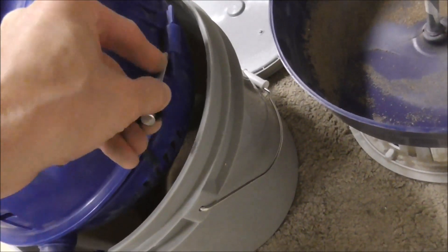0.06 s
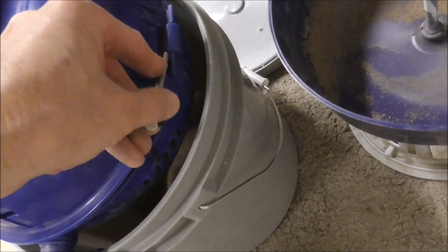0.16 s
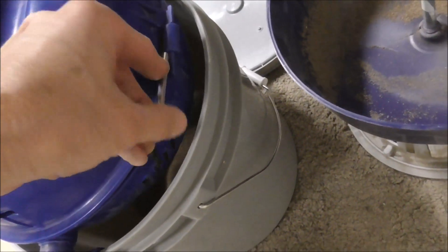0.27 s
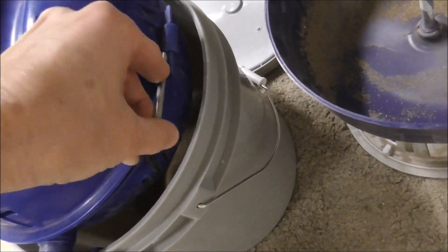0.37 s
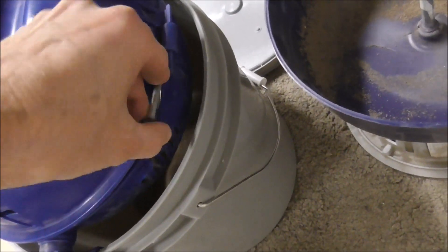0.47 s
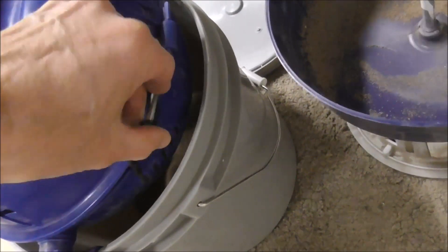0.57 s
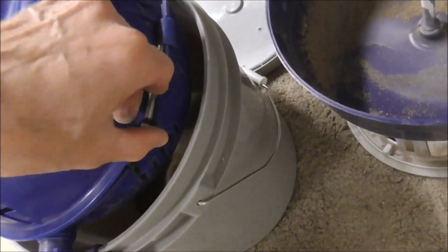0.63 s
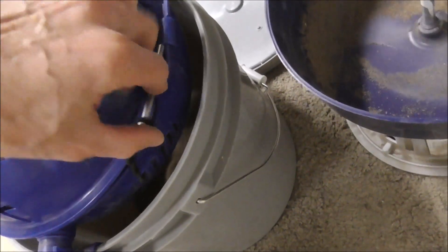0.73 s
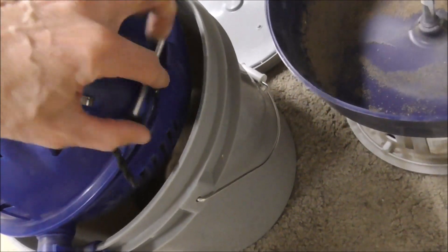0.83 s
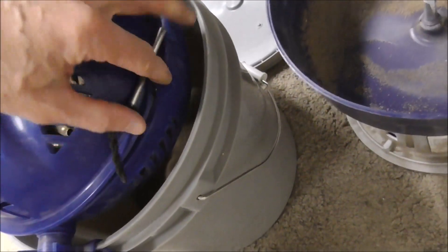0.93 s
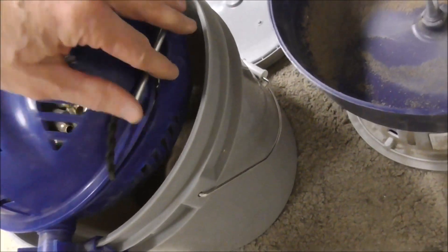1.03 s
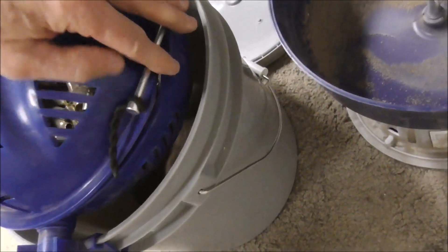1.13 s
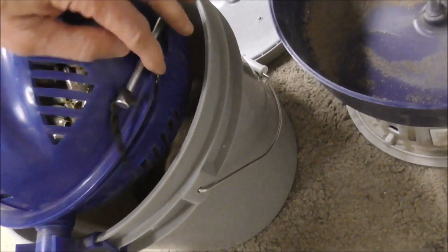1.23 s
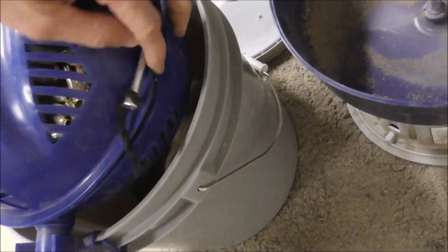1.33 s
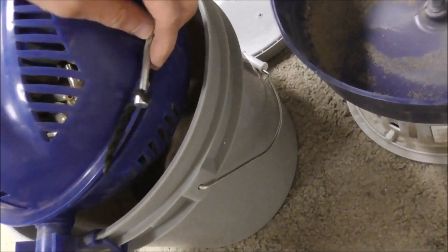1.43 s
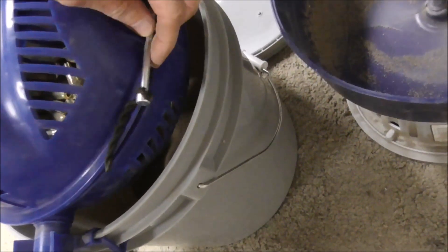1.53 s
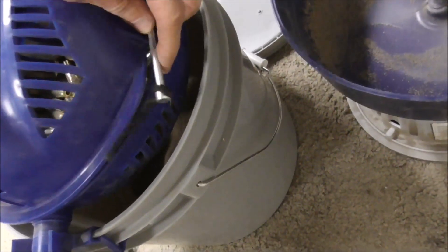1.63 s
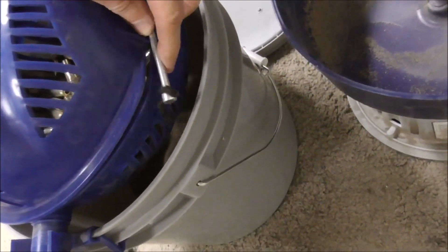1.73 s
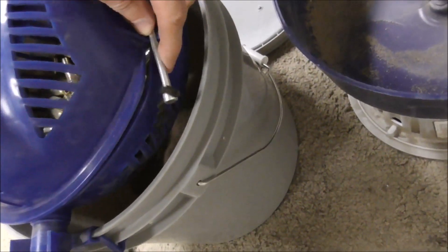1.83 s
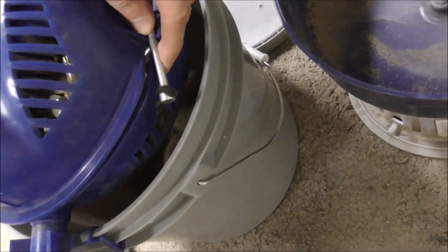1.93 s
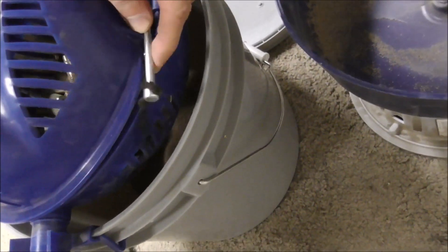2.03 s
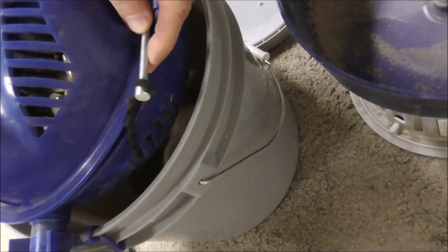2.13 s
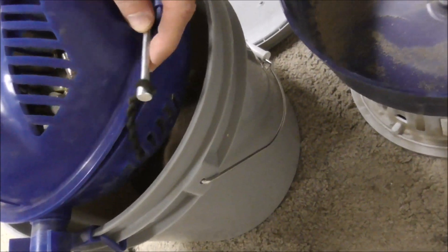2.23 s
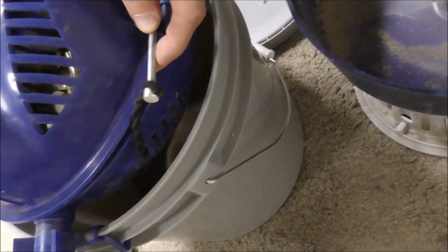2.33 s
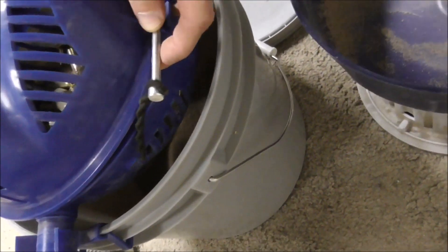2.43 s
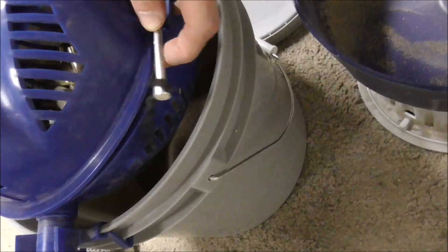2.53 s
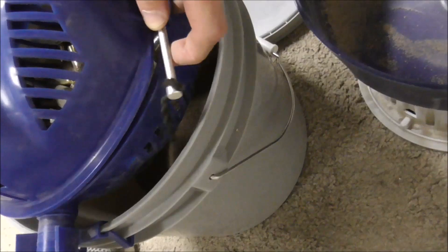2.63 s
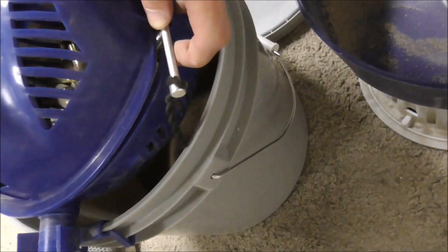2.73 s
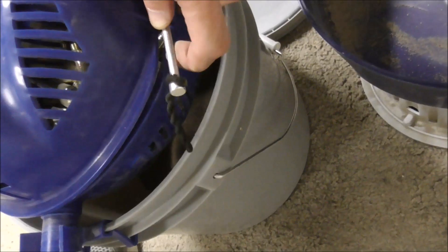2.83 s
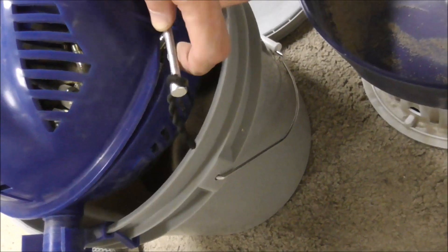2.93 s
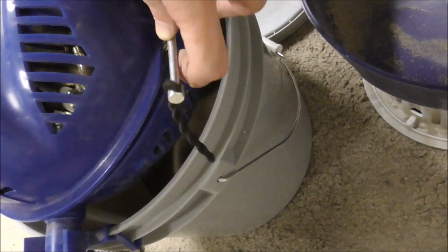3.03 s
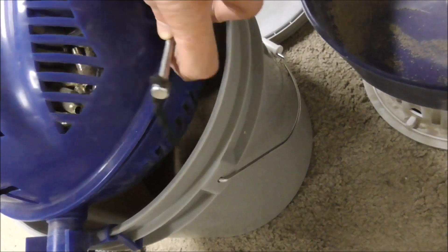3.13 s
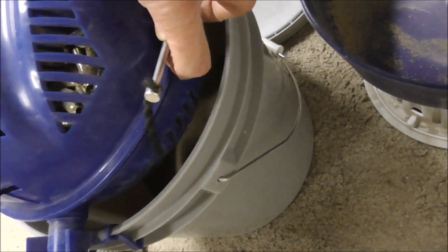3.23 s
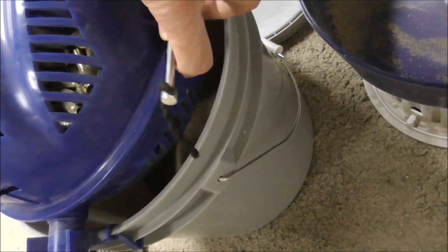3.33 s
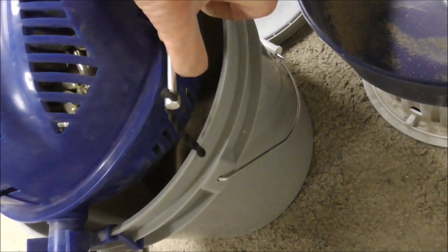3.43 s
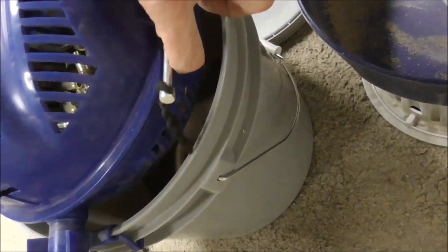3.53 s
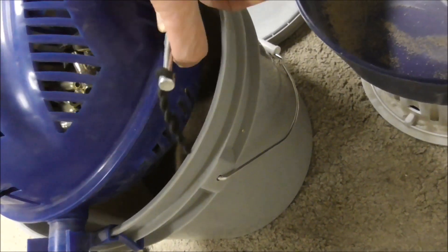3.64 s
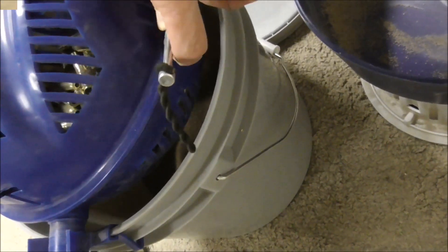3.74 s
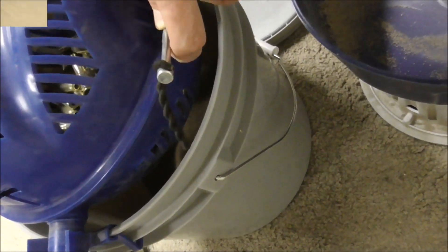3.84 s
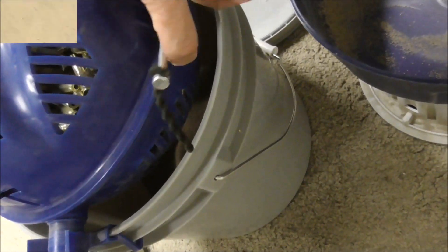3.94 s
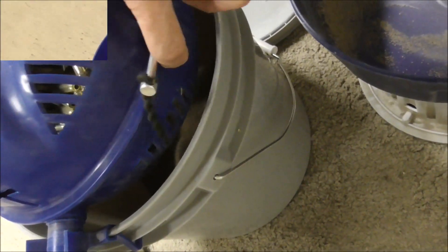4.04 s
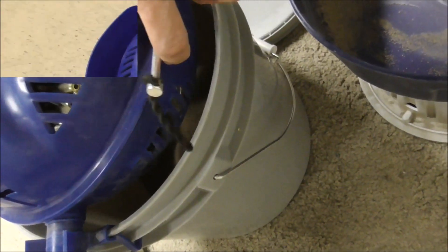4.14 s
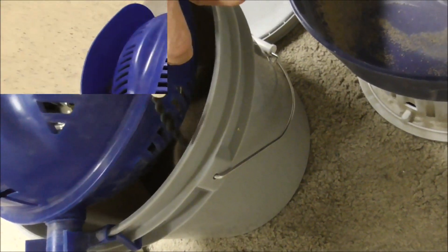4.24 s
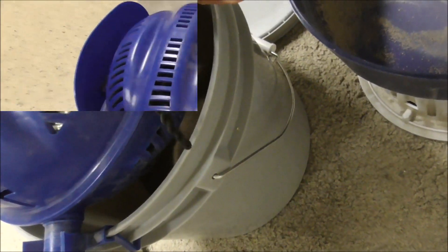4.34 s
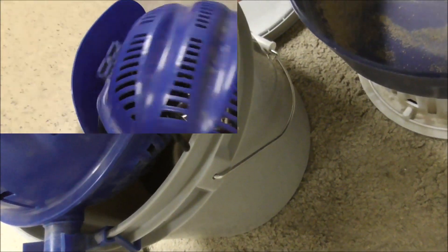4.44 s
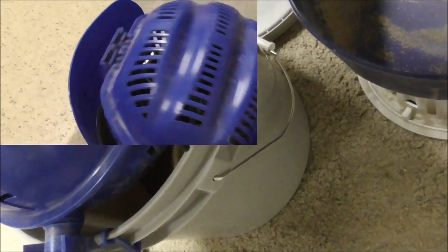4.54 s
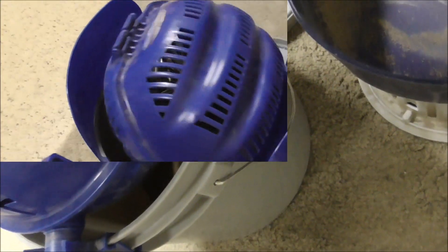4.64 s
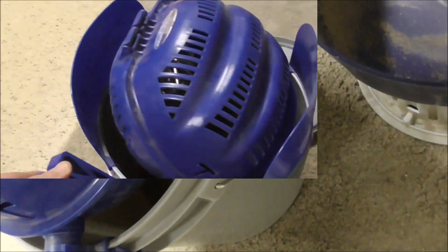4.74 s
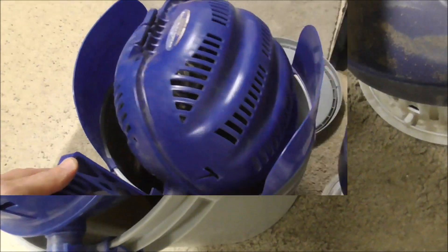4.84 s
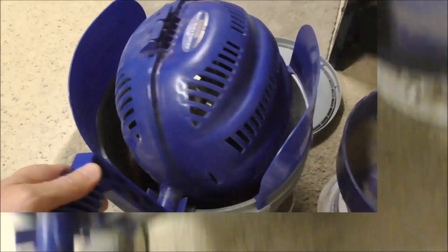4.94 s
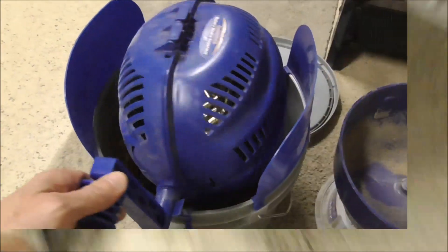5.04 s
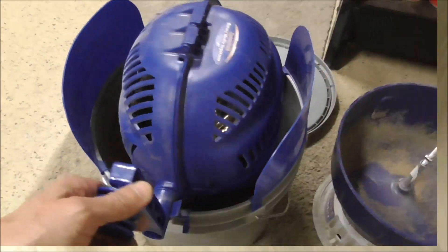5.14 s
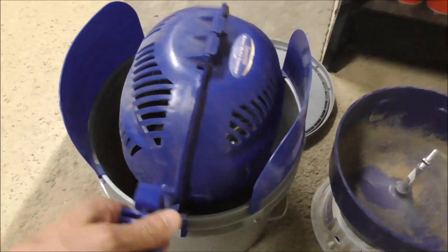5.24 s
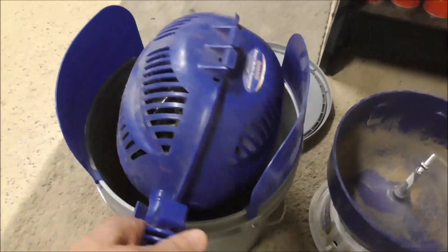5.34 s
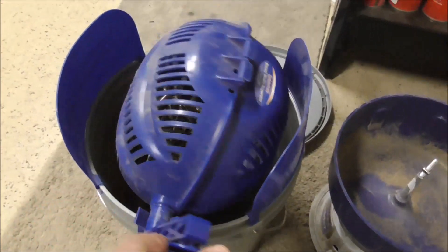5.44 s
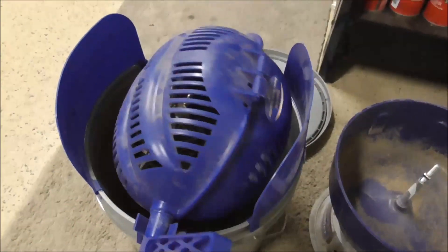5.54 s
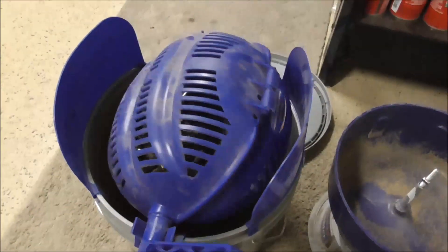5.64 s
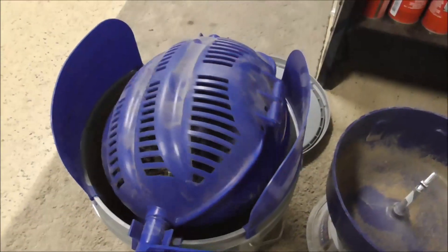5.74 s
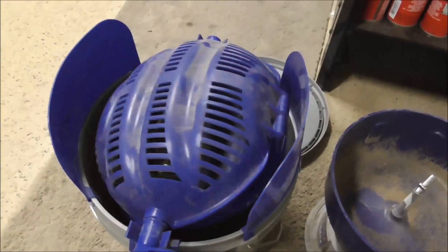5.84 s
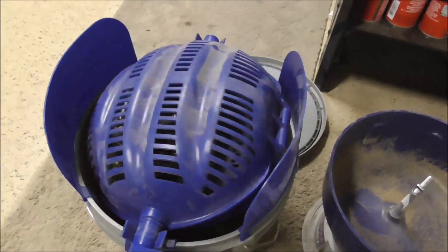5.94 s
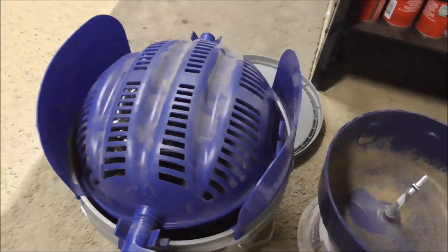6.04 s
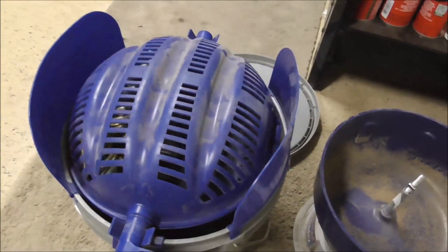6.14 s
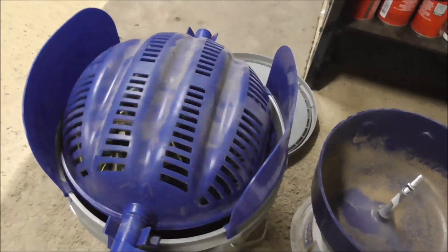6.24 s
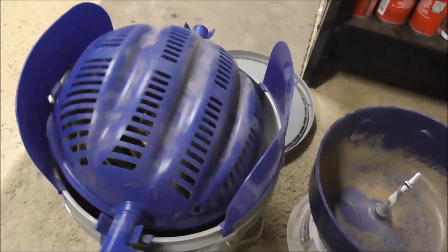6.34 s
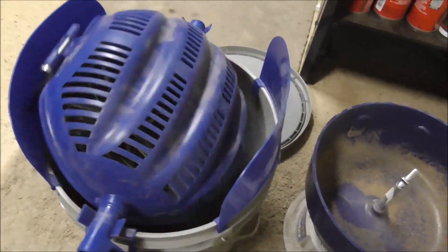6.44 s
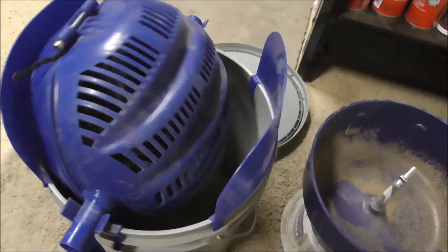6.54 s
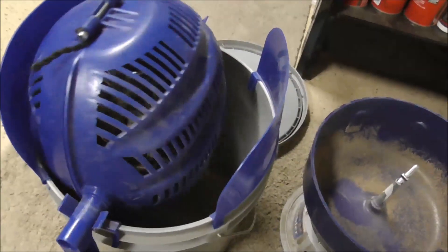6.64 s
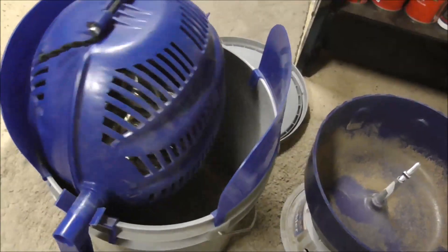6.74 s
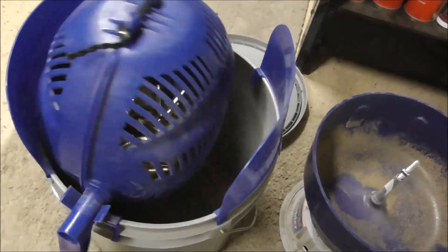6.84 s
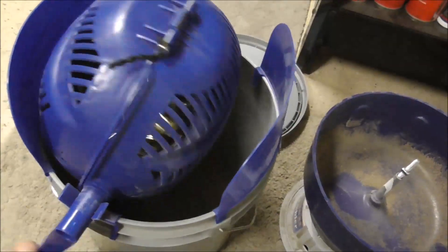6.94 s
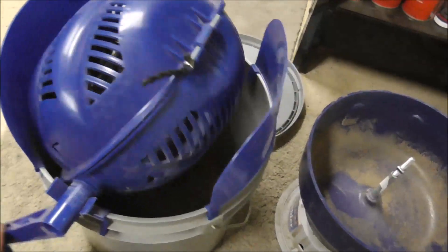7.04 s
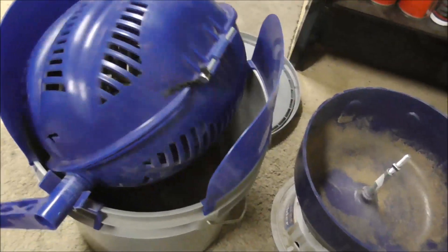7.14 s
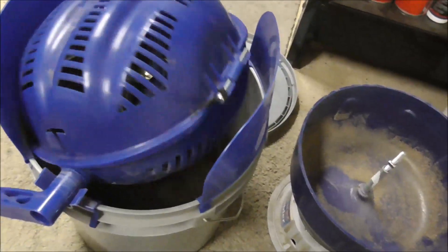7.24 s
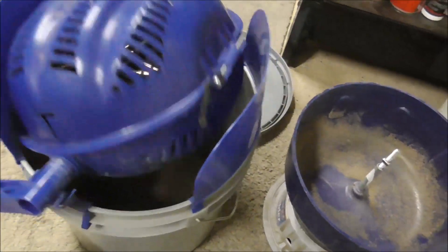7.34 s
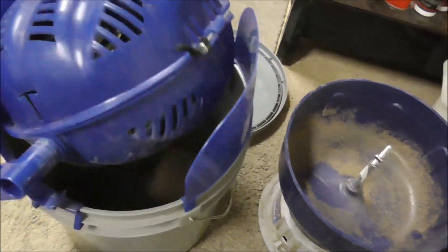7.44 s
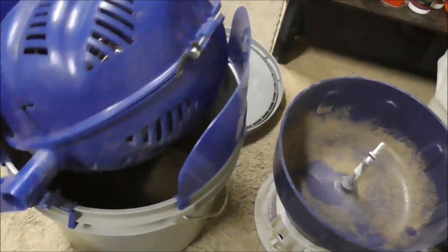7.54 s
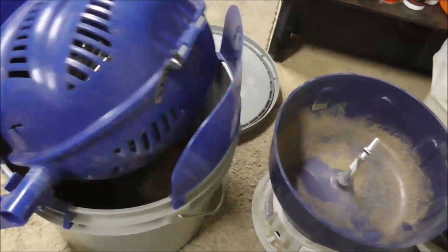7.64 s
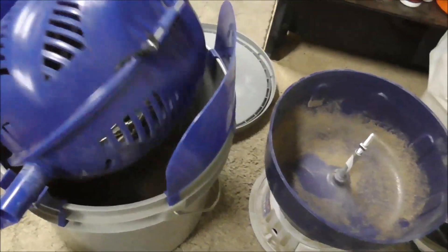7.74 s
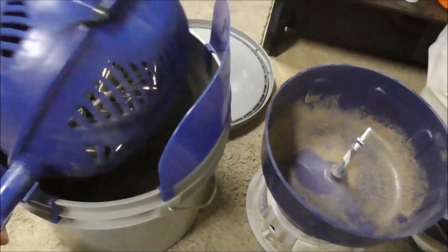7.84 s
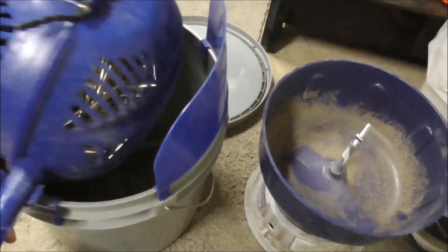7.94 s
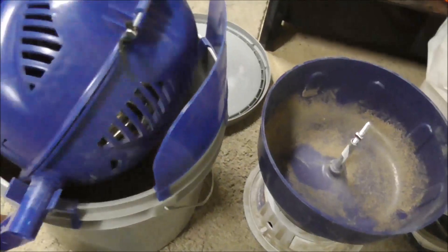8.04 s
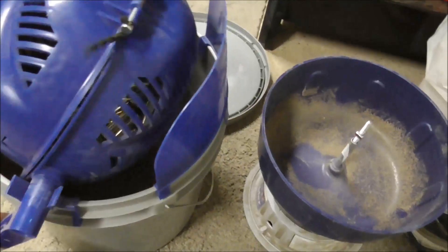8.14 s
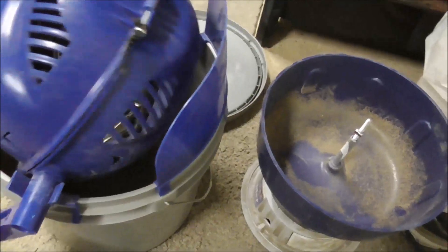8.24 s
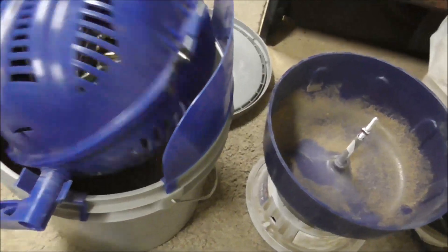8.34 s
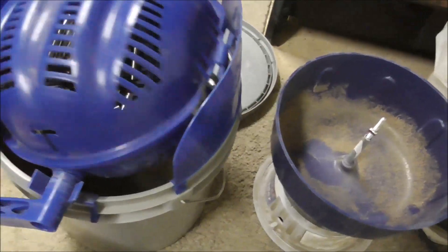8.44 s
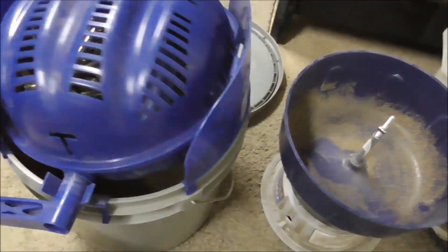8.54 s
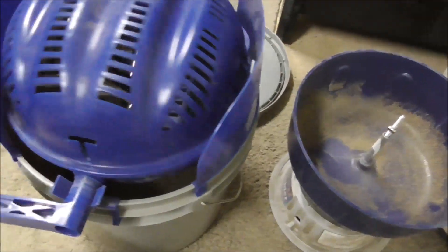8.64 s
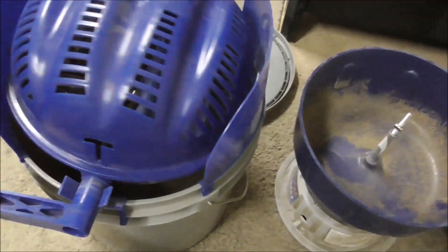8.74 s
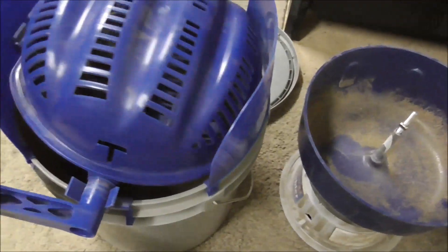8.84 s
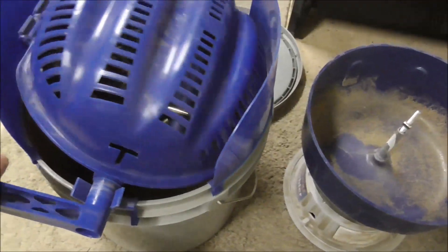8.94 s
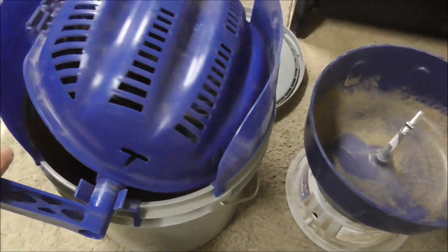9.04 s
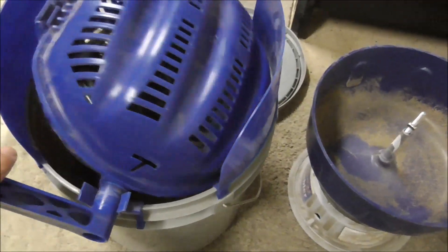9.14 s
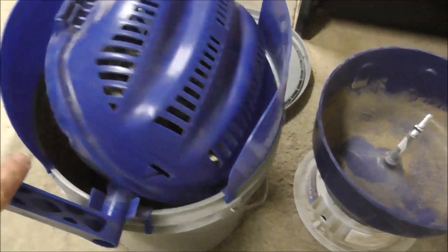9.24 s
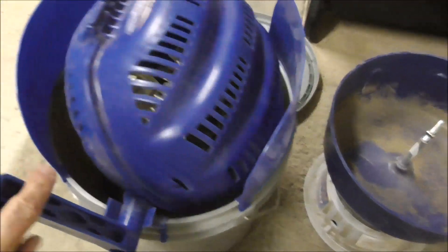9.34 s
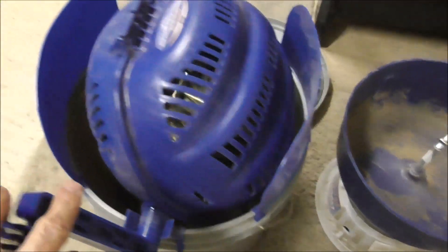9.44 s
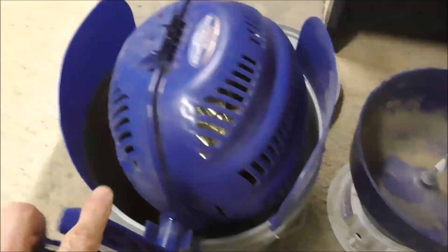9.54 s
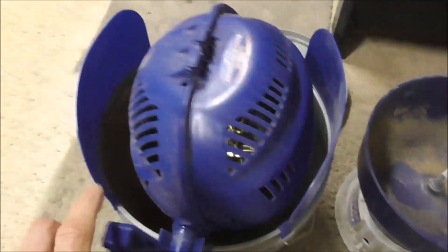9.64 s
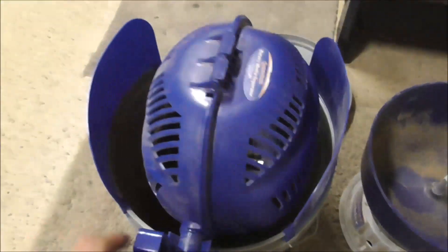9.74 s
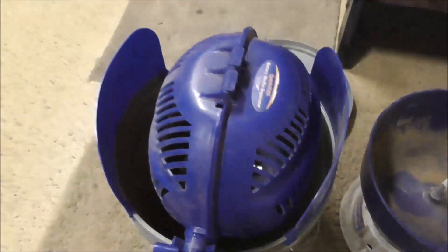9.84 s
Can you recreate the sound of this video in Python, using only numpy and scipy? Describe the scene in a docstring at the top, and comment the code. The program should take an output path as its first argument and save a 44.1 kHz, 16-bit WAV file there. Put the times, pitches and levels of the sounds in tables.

```python
"""A pin scrapes and knocks in the slots of a plastic sifting drum, close by in a small workroom.
The drum rests on a bucket; then it is cranked in spurts and the brass cases inside tumble and ring,
drumming on its wall; once the drum drops back on its seat with a thump.
Brass, wall and bucket are sums of decaying modes, contacts are noise bursts and clicks, rubbing is
coloured noise; diffuse stereo echoes make the room, over still air and a faint low drone."""
import sys
import numpy as np
from scipy import signal
from scipy.fft import rfft, irfft, next_fast_len
from scipy.io import wavfile

SR = 44100
rng = np.random.default_rng(int(sys.argv[2]) if len(sys.argv) > 2 else 0)


def store_pcm(level_fs):
    """Save levels as 16-bit WAV."""
    pcm = np.round(np.clip(level_fs, -1, 1) * 32767).astype(np.int16)
    wavfile.write(sys.argv[1], SR, np.atleast_2d(pcm).T)


N = 435708
TIME = np.arange(N) / SR
GRAIN_TIME = TIME[:SR // 4]

# the load slides as the drum turns:
# (start [s], swell [s], hold [s], settle [s], flow [dB], extra brass ring [dB])
SLIDES = [(4.74, 0.083, 0.036, .05, -13, -8), (4.82, .1, .16, 0.29, .5, -2),
          (5.162, 0.077, 0.043, 0.09, -4, -3.5), (5.338, 0.1, 0.27, .15, -18, -15),
          (5.678, 0.098, .17, .14, -5.5, -8), (6.06, .13, 0.58, .29, 0, -1.5),
          (6.879, 0.081, .14, 0.39, -14.5, 10), (7.198, .14, 0.078, 0.13, -3, -1.5),
          (7.441, .1, 0.1784, 0.34, -13, -1.5), (7.999, .1, 0.056, 0.056, -8, -18),
          (8.609, 0.11, 0.057, 0.045, -10, -11), (8.77, 0.062, .12, .2, -3, 2.5),
          (8.9, .2, 0.29, 0.47, -1.5, 3.5), (9.55, 0.093, 0.078, 0.078, -9.5, 8)]
# while the load slides, the hollow drum rocks and booms: (time of peak [s], half-length [s], level [dB])
ROCKING = [(5.59, 0.073, -42.5), (5.84, 0.16, -38.5)]
# single cases struck hard: (time [s], level before the common trim [dB])
CLINKS = [(4.7366, -30), (4.7885, -23), (4.856, -17.5), (5.1299, -15), (5.3754, -25.5), (5.4226, -26.5),
          (5.4818, -26), (5.5739, -32), (5.605, -29), (5.6504, -17), (5.719, -19), (5.836, -19),
          (5.7454, -12.5), (5.7863, -15.5), (5.87, -11.5), (5.967, -17.5), (6.0311, -14), (6.0774, -9.5),
          (6.1308, -10.5), (6.522, -25), (7.043, -27), (7.1229, -27), (7.2431, -20.5), (7.3292, -14.5),
          (7.6102, -18), (7.6641, -20), (7.6937, -17.5), (7.738, -20), (7.757, -13), (7.897, -27.5),
          (7.9595, -37), (8.1092, -23), (8.1554, -30), (8.3818, -23.5), (8.4248, -25), (8.6281, -39),
          (8.703, -24.5), (8.8016, -16), (9.857, -25.5)]
# blows on the plastic, first by the pin, then by the load and by the drum on its seat:
# (time [s], strength [dB], hardness of the contact [dB], weight behind it [dB])
KNOCKS = [(0.609, -44, -9, 1), (0.7731, -49, -1, -7), (0.9785, -26.5, 0, 3), (1.1681, -45.5, -8, -12),
          (1.4602, -23, -1.5, -0.5), (1.5298, -31, 2.5, -2.5), (1.709, -31.5, 4.5, 6.5), (1.814, -57, 5, 4),
          (2.6706, -57, 2, 7.5), (3.049, -18.5, -0.5, 2), (3.2884, -28, -3, -3), (4.0499, -32, -2, -15),
          (4.345, -36.5, -6, -10), (4.1588, -56, 14.5, -4), (4.7419, -38.5, 5.5, 5.5), (4.791, -47, 4, -1),
          (4.8574, -27, -2, 8), (4.8958, -21.5, -10, 6), (5.0184, -18, -8, 5), (5.4815, -33, 7, -2),
          (5.7519, -16.5, -2.5, 13), (5.836, -19.5, -3.5, -3), (5.911, -16.5, -3.5, -6),
          (5.9509, -17, -3, -8), (6.0299, -19.5, -1, 7.5), (6.1316, -24.5, 0, 6), (6.1549, -19.5, 4.5, 7),
          (6.1878, -16.5, -16, -14), (6.2915, -18, 2, 1), (6.7789, -20.5, -17, -12),
          (7.0453, -24.5, -6, -18), (7.3506, -23, 8.5, 12.5), (7.3902, -24, 5.5, -1),
          (7.431, -24.5, 5.5, -3.5), (7.7566, -25.5, 9.5, -1), (7.8469, -32, 2, 3), (7.8964, -34, 7.5, -3),
          (8.101, -18, -7, 26.5), (8.1067, -19, -14, 15), (8.1624, -31.5, -13, 12.5), (8.7008, -38, 2, 8),
          (8.7997, -27, 5, 9), (8.876, -16.5, 5, 6), (8.9409, -21.5, 12.5, 0), (9.0339, -16, -7, -10),
          (9.6062, -18, -14, -8), (9.72, -28.5, -14, -12), (9.852, -26.5, 4, -18)]
# strokes of fingers, pin and its cord on the plastic:
# (time of peak [s], rise [s], fall [s], level [dB], brightness [dB])
RUBS = [(0.02, 0.05, 0.09, -54.5, -7.5), (0.41, 0.038, 0.035, -60, -1), (0.78, 0.021, 0.026, -62.5, 12),
        (0.88, 0.044, .027, -66, 3), (1.40, 0.081, 0.13, -65, 9), (2.10, 0.035, 0.04, -62, 6),
        (2.21, 0.033, 0.021, -52, -8), (2.50, 0.037, .019, -53.5, 4.5), (3.51, .028, .032, -57.5, -22),
        (3.755, .001, 0.024, -41, 8), (3.825, 0.04, 0.022, -40, 6.5), (3.90, 0.11, .14, -52, 3.5),
        (4.054, 0.031, 0.056, -45, 3), (4.55, 0.5, 0.4, -55.5, 1.5), (8.519, 0.23, 0.087, -50, -7.5)]

# Modes; each voice scales the decay and scatters the pitch.
# ring of a brass case: (frequency [Hz], level [dB], undamped t60 [s], left over right [dB])
BRASS_MODES = [(9890, -2.5, .19, 2.2), (12850, 0, .18, -3.0), (14770, -3.3, .16, -1.5)]
# slats between the slots, wall of the drum, drum and bucket as a whole:
# (frequency [Hz], level [dB], t60 before damping [s])
SLAT_MODES = [(1876, 0.5, 0.019), (2406, 4, 0.021), (3312, 0, 0.024), (4075, -2, 0.023),
              (5020, -9.5, 0.036), (7090, -7.5, 0.057)]
WALL_MODES = [(433, -9.5, 0.019), (555, -10.5, 0.027), (602, 0, 0.04), (668.8, 1.5, 0.041),
              (790, -12.5, 0.018), (1007, -0.5, 0.012), (1249, -5, 0.023), (1440, -10.5, 0.0093)]
BUCKET_MODES = [(177, -10, 0.063), (235.1, 14, 0.13), (293.4, 10.5, 0.1), (362, -17, 0.02)]

# Relative colours of cases clacking, the crack of a blow, the rubbed drum body, its scratched surface,
# the hiss of the rubbing and the still air: (frequency [Hz], density [dB per Hz])
CLATTER_COLOUR = [(900, -27), (1700, 2), (2400, -4.5), (3800, 3.5), (5800, -6), (7100, 2), (9000, 1.5),
                  (15000, 3.5)]
CRACK_COLOUR = [(400, -34.5), (900, -3), (1400, 3.5), (2000, 4.5), (2700, -0.5), (3800, 2.5), (5200, -5.5),
                (7000, -3.5), (10000, -31), (15000, -38)]
RUB_COLOUR = [(100, -23), (240, 7.5), (450, 5), (670, 6.5), (900, 2.5), (1400, -5), (2200, -29),
              (4000, -47)]
SCRATCH_COLOUR = [(1200, -1), (1900, -0.5), (3000, -5.5), (5000, -5), (7000, -7), (9000, -31)]
HISS_COLOUR = [(5000, -23.5), (7500, 1.5), (11500, 0.5), (15000, -12)]
AIR_COLOUR = [(15, -25), (25, -31), (66, 0.5), (170, -6.5), (293, -1), (463, -10.5), (624, -5),
              (936, -12.5), (2550, -27.5), (3820, -25.5), (6380, -29), (7920, -23.5), (11000, -22),
              (14800, -25), (16000, -34)]

# decay of the room: (frequency [Hz], t60 [s])
ROOM_T60 = [(150, 0.5), (600, 0.5), (1300, 0.5), (4000, 0.58), (11000, 0.06)]
# strength of its echo: (frequency [Hz], level [dB])
ROOM_LEVEL = [(150, -13.5), (600, -14.5), (1200, -4), (2500, -16), (5000, -6), (8000, -12), (11000, -5)]

# what the flow sets sounding: (level at 0 dB flow [dB], growth [dB per dB of flow])
RING_LAW, CLATTER_LAW, SLAT_LAW = (-21.5, 1.66), (-28.5, 0.99), (-35, 0.93)  # rings need free tumbling
WALL_LAW, BOOM_LAW = (-25, 0.91), (-40.5, 0.63)
# the flow climbs this range in the swell and loses it in settling, along a rounded arc
SLIDE_RANGE_DB, SLIDE_BEND = 20, 1.5
CRANK_START_S = 4.6
BUSY_GROWTH = 0.6  # dB of collision rate for each dB of flow
HEAP_DAMPING_DB = (-2.5, 16)  # from a case lying on top to one buried in the heap
FREE_DAMPING = 1.3  # times the undamped decay rate

# how long contacts last: a blow on plastic, a case on a case, a clack in the heap
BLOW_T60_S, CLINK_T60_S, CLACK_T60_S = 0.018, 0.014, 0.016
# a blow of reference strength: its thump, crack and snap
BLOW_DB, THUMP_DB, CRACK_DB, SNAP_DB = -24.5, -39, -21, -41
# dB for each dB of strength: soft blows are dull, strong ones bright
THUMP_GROWTH, SNAP_GROWTH = 0.33, 2.1
SNAP_PER_HARDNESS = 0.99  # dB of snap for each dB of hardness
RIM_PITCH = 1.042  # the wall rings this much higher where it is struck near its stiff rim

SCRATCH_BELOW_DB, HISS_BELOW_DB = 10, 10
AIR_DB, DRONE_DB = -61, -76.5
DRONE_HZ = 70
CUTOFF_HZ = 15200


def tumble(busy_per_s, spread_db):
    """Random collisions, denser as the load slides faster; each rings a case, clacks and strikes plastic."""
    flow_db, extra_ring_db = flow()
    ring_db, clatter_db, slat_db, wall_db, boom_db = (
        db + growth * flow_db for db, growth in (RING_LAW, CLATTER_LAW, SLAT_LAW, WALL_LAW, BOOM_LAW))
    boom_db = 20 * np.log10(np.hypot(from_db(boom_db), from_db(rocking())))

    # busy_per_s is the rate at 0 dB flow
    per_s = busy_per_s * from_db(BUSY_GROWTH * np.clip(flow_db, -22, 5))
    per_s = per_s * (TIME > CRANK_START_S)
    hits = np.flatnonzero(rng.random(N) < per_s / SR)
    force = rng.standard_normal(len(hits))

    def heap_case():
        """A case rings, damped by its depth in the heap."""
        return brass(mistune=0.00346, spread_db=5.0, damping=from_db(rng.uniform(*HEAP_DAMPING_DB)))

    def clack():
        """Case meets case with a short coloured burst."""
        return unit(colour(crack(CLACK_T60_S, click=0.13, width=0.71), CLATTER_COLOUR))

    def slat():
        """The slats between the slots clack."""
        return plastic(SLAT_MODES, scatter=0.13, spread_db=6, damping=0.35, width=0.26)

    def wall():
        """The drum wall rings under the load."""
        return plastic(WALL_MODES, scatter=0.055, spread_db=6.5, damping=0.59, width=0.15)

    def boom():
        """Drum and bucket sound as one hollow body."""
        return plastic(BUCKET_MODES, scatter=0.06, spread_db=3.5, damping=0.38, width=0.19)

    voices = [(ring_db + extra_ring_db, heap_case), (clatter_db, clack),
              (slat_db, slat), (wall_db, wall), (boom_db, boom)]
    out = np.zeros((2, N))
    for level_db, voice in voices:
        sounds = [voice() for _ in range(120)]
        # part of each size is the shared force of the collision, part is the voice's own
        size_draw = 0.82 * force + 0.89 * rng.standard_normal(len(hits))
        sizes = from_db(spread_db * np.clip(size_draw, -3, 1.6))
        sizes = sizes / np.sqrt(np.mean(sizes ** 2))
        # a denser stream takes smaller grains for the same level
        gains = sizes * from_db(level_db[hits]) * np.sqrt(SR / per_s[hits])
        for at, gain, which in zip(hits, gains, rng.integers(0, len(sounds), len(hits))):
            add(out, at / SR, gain * sounds[which])
    return out


def flow():
    """How fast the load slides, in dB, and the extra brass ring: each slide swells, holds and settles."""
    power = 1e-12
    for start, swell, hold, settle, flow_db, ring_db in SLIDES:
        since = TIME - start
        before_hold = np.maximum(1 - since / swell, 0)
        after_hold = np.maximum((since - swell - hold) / settle, 0)
        away = before_hold + after_hold
        share = from_db(flow_db - SLIDE_RANGE_DB * away ** SLIDE_BEND) ** 2
        power = power + np.array([share, share * from_db(ring_db) ** 2])
    total_db, ringing_db = 10 * np.log10(power)
    return total_db, ringing_db - total_db


def rocking():
    """Level of the hollow boom of the rocking drum, in dB: a bell-shaped swell for each rock."""
    power = 1e-12
    for s, half, db in ROCKING:
        power = power + (from_db(db) * np.exp(-((TIME - s) / half) ** 2)) ** 2
    return 10 * np.log10(power)


def clinks(trim_db, tick_db):
    """A case falls on top of the heap and rings freely, with a bright tick at its start."""
    out = np.zeros((2, N))
    for s, db in CLINKS:
        ring = brass(mistune=0.00303, spread_db=1.0, damping=FREE_DAMPING)
        gain = from_db(db + trim_db) / np.abs(ring).max()
        tick = unit(band(crack(CLINK_T60_S, click=0.095, width=0.82), 2740, 0.45 * SR))
        add(out, s, gain * ring)
        add(out, s, gain * from_db(tick_db) * tick)
    return out


def brass(mistune, spread_db, damping):
    """One case: its oval wall splits each mode into a beating pair, and no two cases are quite alike."""
    out = np.zeros((2, len(GRAIN_TIME)))
    case_size = rng.normal()
    sides = np.array([[0.5], [-0.5]])
    for hz, db, t60, pan_db in BRASS_MODES * 2:
        own, strength, lead = rng.standard_normal(3)
        pitch = hz * (1 + mistune * (case_size + 0.52 * own))
        phase = 2 * np.pi * pitch * GRAIN_TIME + 0.97 * lead * sides
        decay = from_db(db + spread_db * strength - 60 * damping * GRAIN_TIME / t60)
        out += decay * from_db(pan_db * sides) * np.sin(phase)
    return unit(out)


def knocks(thump_s, wall_s, snap_s, sub_db):
    """Each blow cracks, rings the wall and shakes the bucket."""
    # each duration turns a level into the energy of a sound that holds it so long
    thump_hold, wall_hold, snap_hold = np.sqrt(np.array([thump_s, wall_s, snap_s]) * SR)
    struck_wall = np.array(WALL_MODES) * [RIM_PITCH, 1, 1]
    out = np.zeros((2, N))
    for s, strength_db, hardness_db, weight_db in KNOCKS:
        force_db = strength_db - BLOW_DB
        crack_db = CRACK_DB + force_db + hardness_db
        snap_db = SNAP_DB + SNAP_GROWTH * force_db + SNAP_PER_HARDNESS * hardness_db
        thump_db = THUMP_DB + THUMP_GROWTH * force_db + weight_db

        contact = crack(BLOW_T60_S, click=0.95, width=0.4)
        tick = colour(contact, CRACK_COLOUR)
        add(out, s, from_db(crack_db) * tick / np.abs(tick).max())
        add(out, s, from_db(snap_db) * snap_hold * unit(band(contact, 6360, 11200)))

        wall = plastic(struck_wall, scatter=0.034, spread_db=0.5, damping=0.91, width=0.14)
        add(out, s, from_db(strength_db) * wall_hold * wall)

        thump = from_db(thump_db) * thump_hold
        bucket = plastic(BUCKET_MODES, scatter=0.037, spread_db=2.5, damping=1.17, width=0.26)
        add(out, s, thump * bucket)
        floor = unit(band(crack(t60=0.057, click=0.3, width=0.21), 120, 314))  # the load on the floor
        add(out, s, thump * from_db(sub_db) * floor)
    return out


def plastic(modes, scatter, spread_db, damping, width):
    """One blow on plastic: the spot that is hit sets each mode's pitch, strength and sign."""
    hz, db, t60 = np.array(modes).T[:, :, None]
    pitch, strength, side = rng.standard_normal((3, len(modes), 1))
    t = GRAIN_TIME[:SR // 10]
    decay = from_db(db + spread_db * strength - 60 * damping * t / t60)
    rings = decay * np.sin(2 * np.pi * hz * (1 + scatter * pitch) * t)
    rings = rings * rng.choice([-1, 1], (len(modes), 1))
    sound = np.array([np.sum(rings * (1 + sign * width * side), 0) for sign in (1, -1)])
    # a slotted wall radiates little below its lowest mode
    pole = np.exp(-np.pi * modes[0][0] / SR)
    return unit(signal.lfilter([1, -2, 1], [1, -2 * pole, pole ** 2], sound))


def crack(t60, click, width):
    """The contact itself: a click and a short burst of noise for its dense high modes."""
    t = GRAIN_TIME[:SR // 25]
    burst = unit(white(len(t), width) * from_db(-60 * t / t60))
    burst[:, 0] += click
    return burst


def handling():
    """Each stroke swells and fades; it stirs the hollow drum and scratches its surface."""
    power = np.zeros((3, N))
    for s, rise, fall, db, bright_db in RUBS:
        levels_db = [db, db + bright_db - SCRATCH_BELOW_DB, db + bright_db - HISS_BELOW_DB]
        near = np.flatnonzero(np.abs(TIME - s) < 1)
        since = TIME[near] - s
        stroke = np.exp(-(since / np.where(since < 0, rise, fall)) ** 2)
        power[:, near] += (from_db(levels_db)[:, None] * stroke) ** 2
    body, scratch, hiss = np.sqrt(power)
    out = body * friction(RUB_COLOUR)
    out = out + scratch * friction(SCRATCH_COLOUR)
    return out + hiss * friction(HISS_COLOUR)


def friction(spectrum):
    """Tiny slips of uneven size through a colour; rms 1."""
    slips = np.repeat(from_db(4 * rng.standard_normal(N // 32 + 1)), 32)[:N]
    return unit(colour(white(N, width=0.39) * slips, spectrum)) * np.sqrt(N)


def room(x, first_echo_s, count=3):
    """Diffuse echoes die octave by octave; contacts at different spots beam treble along different paths."""
    t = TIME[:SR // 2]
    bass, treble = (signal.sosfilt(signal.butter(4, 1500, kind, fs=SR, output="sos"), x)
                    for kind in ("low", "high"))
    # the treble wanders among the paths at constant power, with about 120 new draws a second
    moments = TIME[::SR // 120]
    draws = rng.standard_normal((count, len(moments)))
    shares = np.array([np.interp(TIME, moments, draw) for draw in draws])
    shares = shares / np.sqrt(np.sum(shares ** 2, 0))
    onset = np.clip(t / first_echo_s - 1, 0, 1)  # silent until the first echo
    out = 0
    for share in shares:
        echo = 0
        for low in 60 * 2. ** np.arange(8):
            hz = low * np.sqrt(2)
            decay = from_db(-60 * t / at_hz(ROOM_T60, hz))
            tail = unit(white(len(t), width=0.58) * decay * onset)
            echo = echo + from_db(at_hz(ROOM_LEVEL, hz)) * band(tail, low, 2 * low)
        sent = bass / np.sqrt(count) + treble * share
        out = out + signal.oaconvolve(sent, echo, axes=1)[:, :N]
    return out


def still_air():
    """The wide, steady noise of the room at rest: coloured noise."""
    return from_db(AIR_DB) * np.sqrt(N) * unit(colour(white(N, width=0.78), AIR_COLOUR))


def drone():
    """A faint low drone near the middle: a band of low noise about an octave wide."""
    noise = band(white(N, width=0.14), 0.74 * DRONE_HZ, 1.54 * DRONE_HZ)
    return from_db(DRONE_DB) * np.sqrt(N) * unit(noise)


def from_db(db):
    """Decibels to gain."""
    return 10 ** (np.asarray(db) / 20)


def at_hz(points, hz):
    """Read a table on a log-frequency axis."""
    table_hz, values = np.array(points).T
    return np.interp(np.log(np.maximum(hz, 1)), np.log(table_hz), values)


def unit(x):
    """Scale a stereo sound to a mean energy of 1 per channel."""
    return x / np.sqrt(np.sum(x ** 2) / 2 + 1e-20)


def band(x, low_hz, high_hz):
    """Causal band-pass."""
    return signal.sosfilt(signal.butter(2, [low_hz, high_hz], "band", fs=SR, output="sos"), x)


def colour(x, spectrum):
    """Causal (minimum-phase) filter with the given spectrum."""
    size = 2 * next_fast_len(x.shape[-1] // 2 + 1000)
    hz = np.arange(size // 2 + 1) * SR / size
    cepstrum = irfft(np.log(from_db(at_hz(spectrum, hz))))
    # folding the cepstrum onto positive times makes the filter minimum-phase
    cepstrum[1:size // 2] *= 2
    cepstrum[size // 2 + 1:] = 0
    return irfft(rfft(x, size) * np.exp(rfft(cepstrum)))[..., :x.shape[-1]]


def white(size, width):
    """Stereo white noise; width is the side share."""
    mid, side = rng.standard_normal((2, size))
    return mid + width * side * np.array([[1], [-1]])


def add(out, s, sound):
    """Mix a sound in at a time."""
    at = int(np.clip(round(s * SR), 0, N - 1))
    out[:, at:at + sound.shape[1]] += sound[:, :N - at]


def scene():
    """Drum, brass and hand close by, their echoes in the room, over still air and a faint low drone."""
    near = tumble(busy_per_s=850, spread_db=5.5)
    near = near + clinks(trim_db=0.5, tick_db=-7)
    near = near + knocks(thump_s=0.004, wall_s=0.0063, snap_s=0.0034, sub_db=-9)
    near = near + handling()
    return near + room(near, first_echo_s=0.0013) + still_air() + drone()


def record(dry):
    """A steep elliptic low-pass cuts the top."""
    return signal.sosfilt(signal.ellip(10, 0.1, 80, CUTOFF_HZ, fs=SR, output="sos"), dry)


dry = scene()
out = record(dry)
store_pcm(out)
```